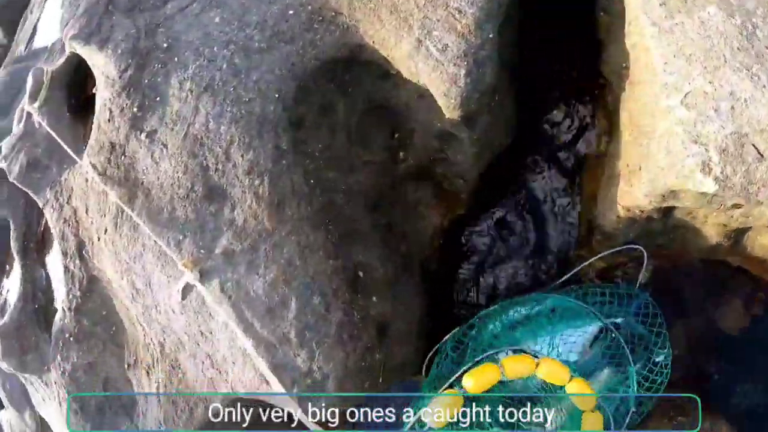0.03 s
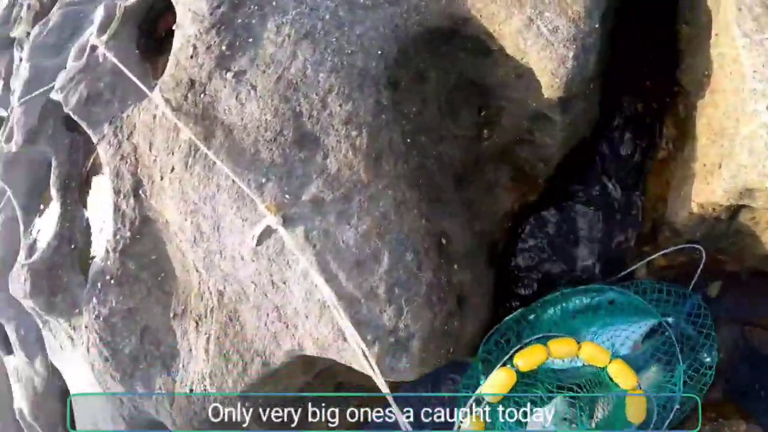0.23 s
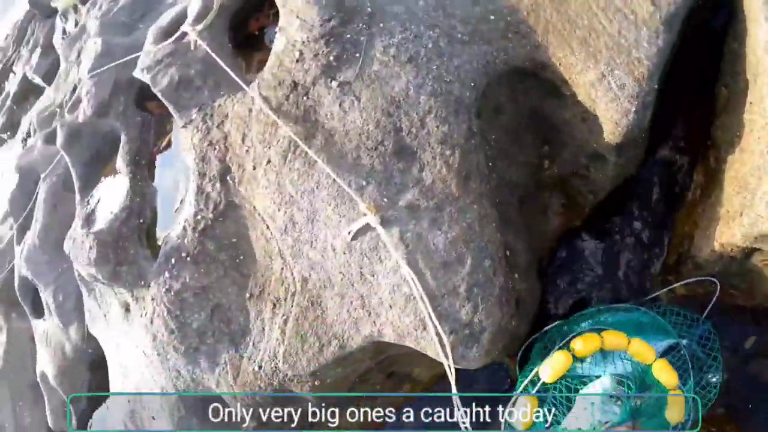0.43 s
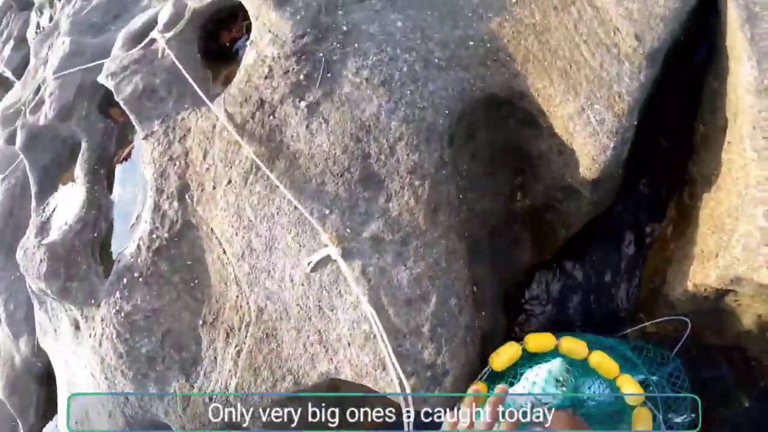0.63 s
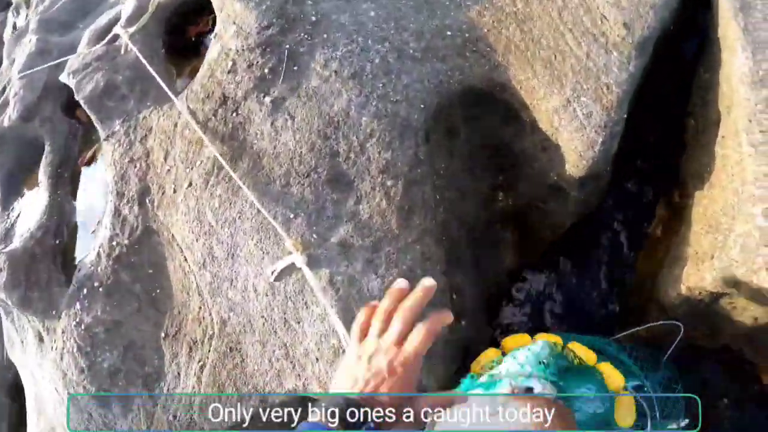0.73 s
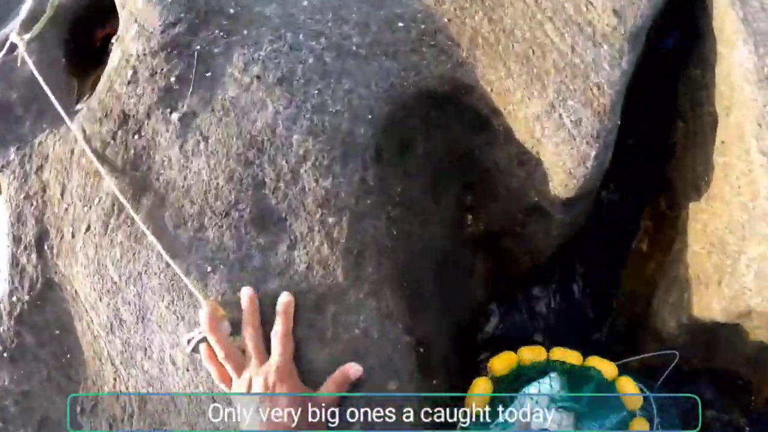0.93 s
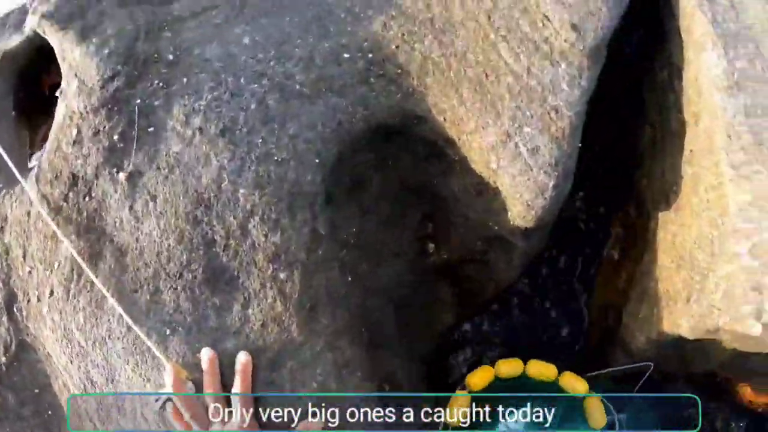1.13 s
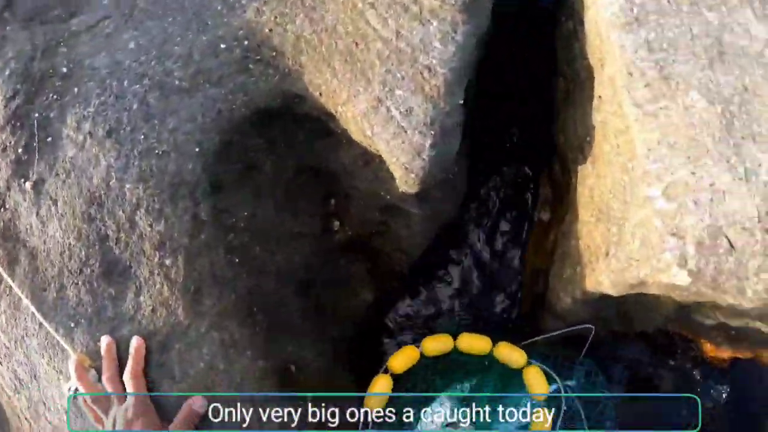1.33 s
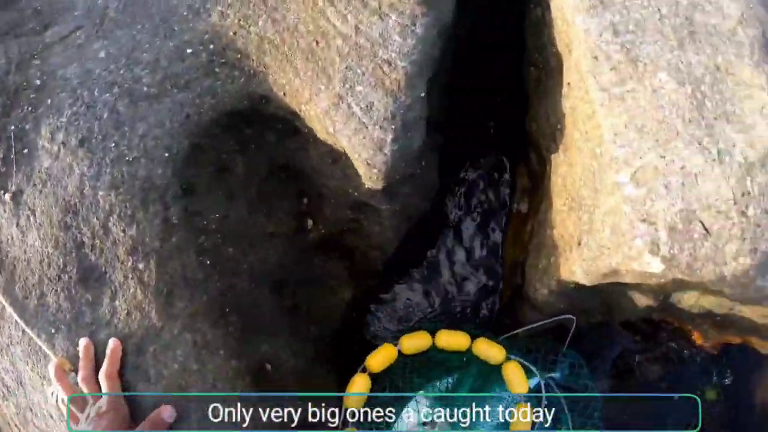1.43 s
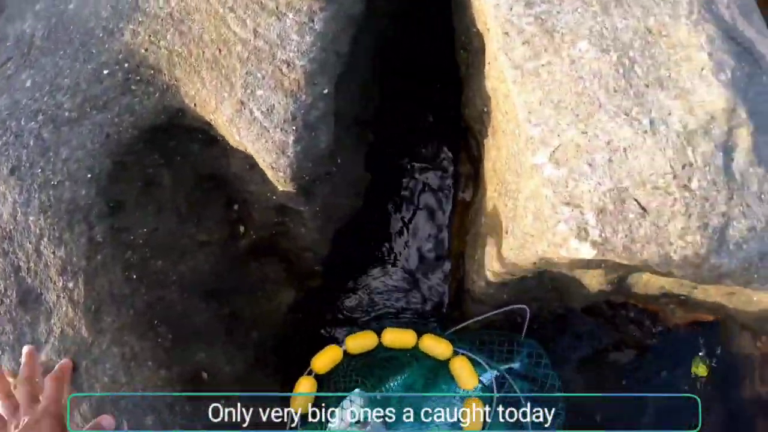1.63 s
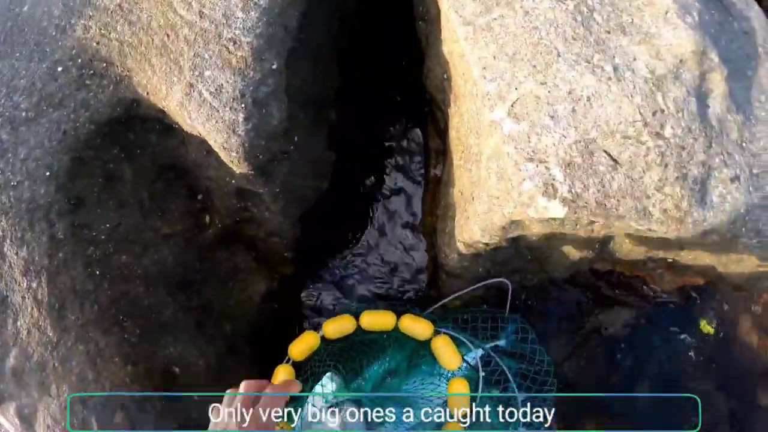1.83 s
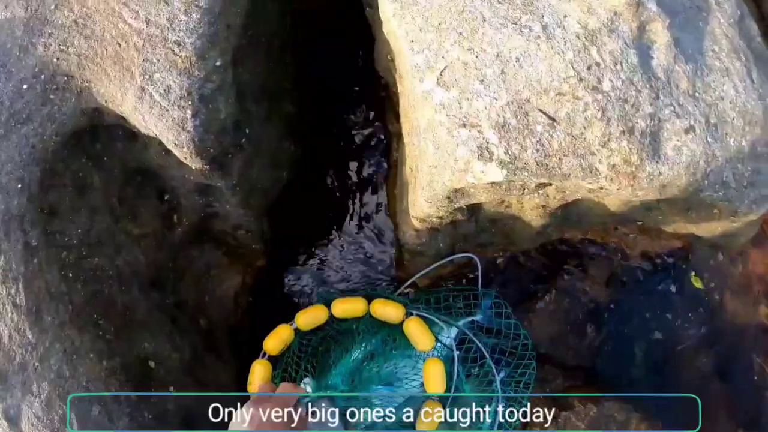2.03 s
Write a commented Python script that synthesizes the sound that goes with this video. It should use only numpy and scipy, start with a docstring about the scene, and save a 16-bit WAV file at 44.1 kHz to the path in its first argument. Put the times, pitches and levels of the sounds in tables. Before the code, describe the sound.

Strong wind rumbles, flutters and pops on a handheld microphone outdoors; behind it, seawater sloshes softly in a gap between boulders, with small splashes, bubbly plops just after the middle and low gulps near the end.

```python
"""Seawater and wind among boulders

Seawater sloshes in a gap: filtered noise and crowds of tiny ringing bubbles follow a swell.
Single bubbles, low gulps and drops are short rings; splashes are bursts of grainy noise.
Wind on the microphone is noise that rumbles, buffets, flutters and drones; hard eddies make dull pops.
The recorder's limiter holds the gusts down."""
import sys
import numpy as np
from scipy import signal
from scipy.fft import rfft, irfft, next_fast_len
from scipy.io import wavfile
from scipy.ndimage import uniform_filter1d

SR = 44100
rng = np.random.default_rng(int(sys.argv[2]) if len(sys.argv) > 2 else 0)


def log_audio(samples):
    """Write samples as a 16-bit WAV file to the path given in sys.argv[1]."""
    # one column per channel
    frames = np.atleast_2d(samples).T
    # limit to full scale, then quantise
    limited = np.clip(frames, -1, 1)
    pcm = np.round(limited * 32767).astype(np.int16)
    wavfile.write(sys.argv[1], SR, pcm)


N = 92080
TIME = np.arange(N) / SR  # s

# All levels are set ahead of the limiter. Colour tables shape a noise, so their levels are relative.
# Slow wind pressure on the microphone: t/s, level/dB
RUMBLE_LEVEL = [(0.0, -17), (0.3, -20), (0.34, -15), (0.38, -23), (0.89, -21.5), (1.0, -31), (1.03, -24),
                (1.31, -17), (1.45, -27.5), (1.53, -19.5), (2.03, -22), (2.08, -29)]
# Tone of the rumble: f/Hz, level/dB
RUMBLE_COLOUR = [(6, -13.5), (20, -2.5), (38, 0), (52, -5), (75, -14.5), (200, -56), (1000, -120)]
# Faster buffeting by the wind: t/s, level/dB
BUFFETING_LEVEL = [(0.0, -24), (0.36, -30), (0.46, -13.5), (0.48, -29), (0.52, -21), (0.69, -28),
                   (0.72, -51), (0.84, -22.5), (0.91, -41), (1.15, -21.5), (1.25, -38), (1.27, -26),
                   (1.8, -25), (1.82, -15), (2.04, -19.5), (2.08, -34)]
# Tone of the buffeting: f/Hz, level/dB
BUFFETING_COLOUR = [(35, -23.5), (60, 5), (75, -0.5), (100, -1), (130, -4), (165, -13.5), (300, -55),
                    (1500, -110)]
# Strength of the fluttering gusts, before a small trim in wind(): t/s, level/dB
FLUTTER_LEVEL = [(0.0, -18), (0.07, -80), (0.09, -44), (0.13, -29.5), (0.34, -32.5), (0.46, -20.5),
                 (0.49, -39), (0.53, -24), (0.75, -37), (0.82, -25.5), (0.84, -34.5), (1.0, -39.5),
                 (1.02, -27.5), (1.08, -53), (1.1, -23), (1.15, -19.5), (1.19, -33.5), (1.32, -34.5),
                 (1.34, -22), (1.36, -54), (1.38, -25), (1.4, -30), (1.43, -23.5), (1.45, -39.5),
                 (1.57, -21.5), (1.59, -27.5), (1.71, -38), (1.75, -23.5), (1.77, -29), (2.08, -23.5)]
# Tone of the flutter: f/Hz, level/dB
FLUTTER_COLOUR = [(60, -19.5), (130, 4.5), (200, 4.5), (300, -4.5), (450, -13.5), (700, -22.5), (1400, -45),
                  (4000, -68.5), (12000, -110)]
# Drone of the wind in the microphone port: t/s, level/dB
DRONE_LEVEL = [(0, -54), (.12, -36.5), (.2, -40.5), (.38, -54), (.46, -38), (.5, -37), (.61, -31),
               (.7, -68), (1.08, -70), (1.13, -34), (1.2, -47), (1.42, -38.5), (1.47, -55), (1.72, -47.5),
               (1.8, -35.5), (1.95, -31), (2.08, -32)]
# Tone of the drone: f/Hz, level/dB
DRONE_COLOUR = [(100, -41), (230, -6), (265, -1), (305, -0.5), (360, 0), (450, -10), (530, -10.5),
                (700, -33.5), (1500, -37.5), (6000, -110)]
LUMP_DB, LUMPS_PER_S = 3, 45  # uneven strength of flutter and drone

# Swell of the water in the gap, before the wash and trickle gains: t/s, level/dB
SWELL_LEVEL = [(0, -50.5), (.07, -52.5), (.12, -51), (.3, -47), (.37, -50), (.58, -49.5), (.73, -54),
               (.92, -49.5), (1.0, -52.5), (1.15, -46.5), (1.25, -44.5), (1.43, -49), (1.49, -47),
               (1.61, -45.5), (1.7, -47.5), (1.9, -45.5), (2.08, -50)]
# Tone of the water: f/Hz, level/dB
WATER_COLOUR = [(150, -12), (400, 5), (800, 7), (1300, 3.5), (2000, -2), (3000, -6), (4000, -10.5),
                (5000, -29), (7300, -20), (9000, -31), (11500, -42.5), (15000, -65)]
# Fine fizzing foam: t/s, level/dB
FOAM_LEVEL = [(0, -64), (.75, -68.5), (1.0, -60), (1.14, -55.5), (1.27, -61), (1.7, -66), (1.8, -57.5),
              (2.08, -57.5)]
# Tone of the foam: f/Hz, level/dB
FOAM_COLOUR = [(500, -42), (2000, -12.5), (4500, -4.5), (6000, -11), (8000, -19.5), (10500, -28.5),
               (15000, -47.5)]
WASH_DB, TRICKLE_DB = 4.5, -1  # each against the swell
PATCH_DB = 1  # unevenness of the wash
TRICKLE_PER_S, TRICKLE_SPREAD_DB = 900, 3.5  # bubbles of all pitches together; spread of loudness
TRICKLE_CYCLES = 11.6  # decay time in cycles of the pitch

# Single bubbles, each before its onset and added splash: t/s, pitch f/Hz, level/dB, decay/s
BUBBLES = [(.006, 2250, -46, 0.005), (1.134, 2400, -35.5, 0.004), (1.143, 2180, -39, 0.0029),
           (1.202, 751, -24.5, 0.0078), (1.209, 814, -32, 0.0096), (1.204, 1570, -35, 0.0037),
           (1.239, 1390, -30.5, 0.0027), (1.351, 2820, -39.5, 0.014), (1.459, 2550, -29.5, 0.0032),
           (1.507, 970, -33.5, 0.0084), (1.737, 1880, -33.5, 0.0064), (1.739, 2400, -46.5, 0.0039),
           (1.775, 2595, -40.5, .008)]
BUBBLE_RISE = 0.028  # share by which the pitch climbs in one decay time
BUBBLE_ONSET_S = 0.00014
BUBBLE_SPLASH_DB, BUBBLE_SPLASH_OCTAVES = -6, 0.38  # gain against the ring; width

# Drops that tick on the rock, before their envelope: t/s, level/dB, decay/s, pitch f/Hz
TICKS = [(0.099, -44, 0.0012, 7400), (.0994, -29, .0014, 1880), (.106, -43, .002, 2090),
         (.844, -50.5, .0012, 5200), (1.319, -51, .003, 6840), (1.345, -44, 0.0017, 6200),
         (1.3434, -36, 0.001, 3000), (1.85, -43, 0.0013, 4200), (2.012, -42, .002, 4300),
         (2.054, -42.5, .003, 1600)]
TICK_OCTAVES = 0.34  # width

# Short splashes, before the rock echoes: t/s, rise/s, decay/s, slap level/dB, spray level/dB, spray f/Hz
SPLASHES = [(0.102, .0035, 0.0091, -40.5, -53, 8550), (0.253, 0.0054, 0.0078, -55, -85, 3950),
            (0.33, 0.008, .012, -59, -63, 6460), (.675, .02, 0.047, -57, -69, 6400),
            (0.844, 0.023, 0.012, -56, -59, 4800), (1.033, 0.012, 0.013, -47, -60, 7900),
            (1.056, 0.016, 0.011, -40.5, -53, 6500), (1.136, 0.0075, 0.025, -48, -61, 6800),
            (1.343, .008, 0.011, -52.5, -63, 6900), (1.603, 0.014, 0.021, -45.5, -75, 4480),
            (1.905, 0.01, 0.01, -40.5, -59, 6400)]
# Tone of the slap: f/Hz, level/dB
SLAP_COLOUR = [(200, -15.5), (700, 1.5), (1200, 3.5), (2400, -1.5), (3500, -7), (5000, -12), (12000, -87)]
SPRAY_OCTAVES, SPRAY_TOP_HZ = 0.5, 11300  # width; upper limit
SPRAY_GRAIN_DB, SPRAY_GRAINS_PER_S = 2.5, 180
ROCK_DB, ROCK_T60_S = -9, 0.15  # echo gain; time for the echoes to fall by 60 dB

# Eddies that pop on the microphone: t/s, length/s, level/dB, corner f/Hz
POPS = [(0.128, 0.0061, -34, 450), (0.153, 0.0031, -25.5, 330), (0.404, .0015, -21.5, 700),
        (0.4233, 0.0042, -26.5, 665), (0.432, 0.0034, -31, 900), (0.4532, 0.0026, -12, 400),
        (0.5104, 0.0035, -22.5, 980), (.524, 0.0055, -28, 1300), (0.5313, 0.0017, -17.5, 900),
        (.537, .006, -25, 1300), (1.143, 0.0051, -28, 640), (1.331, 0.0046, -26, 480),
        (1.382, 0.0096, -29.5, 513), (1.562, 0.0065, -27, 730), (1.824, 0.0032, -27, 770),
        (1.838, 0.0026, -28.5, 700), (1.884, .0045, -23.5, 560), (1.961, 0.0042, -24.5, 560),
        (2.013, 0.003, -24.5, 650), (2.055, 0.0037, -29.5, 1330)]
POP_LOW_HZ, POP_TOP_HZ = 180, 3500  # low cut of the pop; upper limit of its skirt
POP_SLOPE, POP_TAIL_SLOPE = 4.33, 2.24  # filter exponents of body and skirt
POP_TAIL_DB = -15.5  # skirt against body
POP_PULSE_SHARE = 0.33  # weight of the pressure dip; the rest is turbulence

# Low gulps, before roughness: middle t/s, length/s, pitch f/Hz, glide/(octaves per s), level/dB
GULPS = [(1.14, 0.012, 205, -2, -21.5), (1.378, 0.01, 205, -2, -20.5), (1.424, 0.023, 260, -21.5, -29.5),
         (1.757, .012, 208.7, -4, -27.5), (1.79, .02, 291.8, 9, -29), (1.835, 0.013, 320, 9, -20),
         (1.911, .017, 268.6, -6.5, -19.5), (1.938, 0.0097, 512.7, -16, -25), (1.95, 0.021, 327.5, 3, -25),
         (2.015, 0.0084, 302, 11, -22), (2.045, 0.016, 352.6, 2.5, -23.5),
         (2.078, .013, 249.7, -13.5, -18.5)]
GULP_ROUGH, GULP_ROUGH_PER_S = 0.45, 130

LIMIT_DB, LIMIT_RATIO, LIMIT_WINDOW_S = -16.5, 2.5, 0.022
FADE_S, EDGE_HZ = 0.006, 15700


def amp(db):
    """Turns decibels into gain."""
    return 10 ** (np.asarray(db) / 20)


def unit(x):
    """Scales a sound to an average strength (rms) of 1."""
    return x / np.sqrt(np.mean(x ** 2) + 1e-20)


def level(points):
    """Draws a gain over time through (t/s, level/dB) points."""
    return amp(np.interp(TIME, *np.transpose(points)))


def shaped(x, gain):
    """Filters x by a gain that depends on frequency, then scales it to rms 1."""
    size = next_fast_len(len(x), True)
    hz = np.fft.rfftfreq(size, 1 / SR) + 1  # 1 Hz up, to stay clear of zero
    return unit(irfft(rfft(x, size) * gain(hz), size)[:len(x)])


def coloured(x, points):
    """Filters x by (f/Hz, level/dB) points, then scales it to rms 1."""
    hz, db = np.transpose(points)
    return shaped(x, lambda f: amp(np.interp(np.log(f), np.log(hz), db)))


def bell(f, centre_hz, octaves):
    """Gives a bell-shaped filter gain around a centre pitch."""
    return np.exp(-0.5 * (np.log2(f / centre_hz) / octaves) ** 2)


def noise():
    """Makes white noise: equal strength at all frequencies."""
    return rng.standard_normal(N)


def drift(rate):
    """Makes a smooth random wander, mostly slower than about rate cycles a second."""
    return shaped(noise(), lambda f: 1 / (1 + (f / rate) ** 4))


def power(x, window_s):
    """Averages the squared sound over a short sliding window."""
    t = np.arange(-4000, 4001) / SR
    window = np.exp(-(2 * t / window_s) ** 2)
    return abs(signal.fftconvolve(x ** 2, window / window.sum(), "same")) + 1e-12


def steadied(x, window_s):
    """Evens out the chance swells of a noise."""
    return x / np.sqrt(power(x, window_s))


def add(mix, s, sound):
    """Mixes a sound in at time s."""
    part = mix[max(round(s * SR), 0):][:len(sound)]
    part += sound[:len(part)]


def wind():
    """Eddies of falling size press on the microphone: rumble, buffeting, lumpy flutter and drone."""
    rumble = steadied(coloured(noise(), RUMBLE_COLOUR), window_s=0.045) * level(RUMBLE_LEVEL)
    buffeting = steadied(coloured(noise(), BUFFETING_COLOUR), window_s=0.12) * level(BUFFETING_LEVEL)
    flutter = steadied(coloured(noise(), FLUTTER_COLOUR), window_s=0.02) * level(FLUTTER_LEVEL)
    drone = steadied(coloured(noise(), DRONE_COLOUR), window_s=0.02) * level(DRONE_LEVEL)
    wander = steadied(drift(rate=LUMPS_PER_S), window_s=0.079)
    lumps = unit(amp(LUMP_DB * wander))
    return rumble + buffeting + lumps * (amp(-0.85) * flutter + drone)


def bubble(hz, decay_s):
    """A bubble rings and dies away, its pitch rising as it nears the surface."""
    t = np.arange(0, 7 * decay_s, 1 / SR)
    turns = hz * (t + BUBBLE_RISE * t ** 2 / (2 * decay_s))
    onset = 1 - np.exp(-t / BUBBLE_ONSET_S)
    return np.sin(2 * np.pi * turns) * np.exp(-t / decay_s) * onset


def trickle(count=40):
    """Tiny bubbles of many sizes ring at random moments, each size with its own pitch."""
    out = np.zeros(N)
    for hz in np.geomspace(500, 4500, count):
        loudness = amp(TRICKLE_SPREAD_DB * np.minimum(rng.exponential(1, N), 4))
        starts = rng.random(N) < TRICKLE_PER_S / count / SR
        ring = bubble(hz, TRICKLE_CYCLES / hz)
        ring /= np.linalg.norm(ring)
        out += signal.oaconvolve(loudness * starts, ring)[:N] * np.sqrt(hz)
    return out


def patchy_wash():
    """Rushing water is noise whose strength varies in patches over time and frequency."""
    grid = signal.stft(noise(), nperseg=512, noverlap=384)[2]
    patches = rng.standard_normal(grid.shape[::-1])  # time runs down, frequency across
    patches = uniform_filter1d(patches, size=8, axis=0)
    patches = unit(uniform_filter1d(patches, size=7, axis=1)).T
    return signal.istft(grid * amp(PATCH_DB * patches), nperseg=512, noverlap=384)[1][:N]


def water():
    """Wash and tiny bubbles rise and fall with the swell; noise with its own level makes the foam."""
    wash = amp(WASH_DB) * coloured(patchy_wash(), WATER_COLOUR)
    bubbles = amp(TRICKLE_DB) * coloured(trickle(), WATER_COLOUR)
    foam = coloured(noise(), FOAM_COLOUR) * level(FOAM_LEVEL)
    return (wash + bubbles) * level(SWELL_LEVEL) + foam


def plops():
    """Larger bubbles stand out of the slosh, each with a little noisy splash around its pitch."""
    out = np.zeros(N)
    for s, hz, db, decay in BUBBLES:
        ring = bubble(hz, decay)
        t = TIME[:len(ring)]
        splash = shaped(noise(), lambda f: bell(f, hz, BUBBLE_SPLASH_OCTAVES))[:len(ring)]
        envelope = np.exp(-t / decay) * np.minimum(t * hz, 1)  # one cycle to rise
        add(out, s, amp(db) * (ring + amp(BUBBLE_SPLASH_DB) * splash * envelope))
    return out


def ticks():
    """Single drops hit the rock: noise around one pitch rises within a cycle and dies at once."""
    out = np.zeros(N)
    t = TIME[:SR // 20]
    for s, db, decay, hz in TICKS:
        ring = shaped(noise()[:len(t)], lambda f: bell(f, hz, TICK_OCTAVES))
        envelope = np.exp(-t / decay) * np.minimum(t * hz, 1)
        add(out, s, amp(db) * ring * envelope)
    return out


def splashes():
    """Water slaps the rock and throws a grainy spray: a dull and a bright band of one noise."""
    out = np.zeros(N)
    for s, rise, decay, slap_db, spray_db, spray_hz in SPLASHES:
        drops = noise() * amp(SPRAY_GRAIN_DB * drift(rate=SPRAY_GRAINS_PER_S))
        slap = coloured(drops, SLAP_COLOUR)
        spray = shaped(drops, lambda f: bell(f, spray_hz, SPRAY_OCTAVES) / (1 + (f / SPRAY_TOP_HZ) ** 8))
        envelope = np.exp(-np.where(TIME < s, ((s - TIME) / rise) ** 2, (TIME - s) / decay))
        out += envelope * (amp(slap_db) * slap + amp(spray_db) * spray)
    return out


def rocks(x):
    """Boulders return short scattered echoes: random taps that die away."""
    t = TIME[:SR // 4]
    hits = (rng.random(len(t)) < 2000 / SR) * (t > 0.003)  # 2000 echoes per s, none in the first 3 ms
    taps = rng.standard_normal(len(t)) * hits * amp(-60 * t / ROCK_T60_S)
    return x + amp(ROCK_DB) * signal.fftconvolve(x, taps / np.linalg.norm(taps))[:N]


def pop_colour(f, corner_hz):
    """A pop is dull: it weakens above its corner, but for a faint skirt, and loses its lowest bass."""
    body = 1 / (1 + (f / corner_hz) ** POP_SLOPE)
    skirt = amp(POP_TAIL_DB) / (1 + (f / corner_hz) ** POP_TAIL_SLOPE) / (1 + (f / POP_TOP_HZ) ** 8)
    return (body + skirt) / (1 + (POP_LOW_HZ / f) ** 3)


def pops():
    """Each hard eddy is a sharp pressure dip inside a few milliseconds of turbulence."""
    out = np.zeros(N)
    for s, length, db, corner_hz in POPS:
        window = np.exp(-((TIME - s) / length) ** 2)
        click = -1.0 * (np.arange(N) == round(s * SR))
        dip = shaped(click, lambda f: pop_colour(f, corner_hz))
        turbulence = unit(shaped(noise(), lambda f: pop_colour(f, corner_hz)) * window)
        pop = unit(np.sqrt(POP_PULSE_SHARE) * dip + np.sqrt(1 - POP_PULSE_SHARE) * turbulence)
        out += amp(db) * pop * np.sqrt(np.mean(window ** 2))  # longer pops carry more energy
    return out


def gulps():
    """Air pockets between the rocks ring briefly, gliding as the water fills or leaves them."""
    out = np.zeros(N)
    for s, length, hz, glide, db in GULPS:
        pitch = hz * 2 ** (glide * np.clip(TIME - s, -2 * length, 2 * length))
        turns = np.cumsum(pitch) / SR + rng.random()
        roughness = 1 + GULP_ROUGH * drift(rate=GULP_ROUGH_PER_S)
        envelope = np.exp(-((TIME - s) / length) ** 2)
        out += amp(db) * np.sin(2 * np.pi * turns) * roughness * envelope
    return out


def scene():
    """Adds the wind at the microphone to the water; only splashes and plops echo off the rocks."""
    echoing = rocks(splashes() + plops())
    return (wind() + water() + ticks() + echoing + pops() + gulps())[None]


def record(dry):
    """Turns loud moments down with a limiter, softens both ends and cuts the highest treble."""
    over_db = np.maximum(10 * np.log10(power(dry[0], LIMIT_WINDOW_S)) - LIMIT_DB, 0)
    ramp = np.minimum(np.minimum(TIME, TIME[::-1]) / FADE_S, 1)
    ends = np.sin(np.pi / 2 * ramp) ** 2
    held = dry * amp(-over_db * (1 - 1 / LIMIT_RATIO)) * ends
    treble_cut = signal.firwin(511, EDGE_HZ, window=("kaiser", 9), fs=SR)
    return signal.oaconvolve(held, treble_cut[None], "same")


dry = scene()
out = record(dry)
log_audio(out)
```